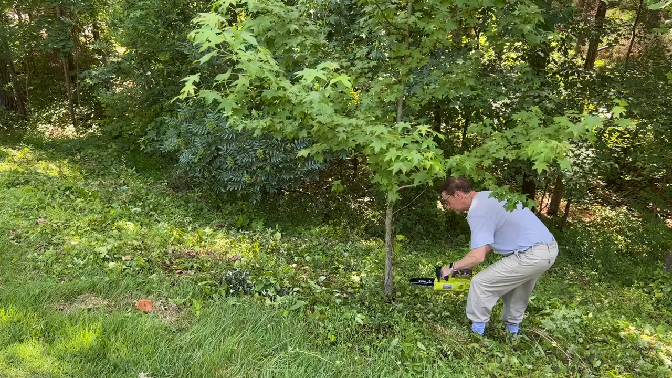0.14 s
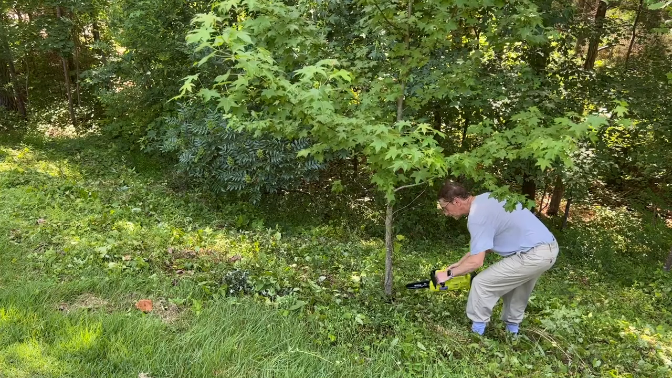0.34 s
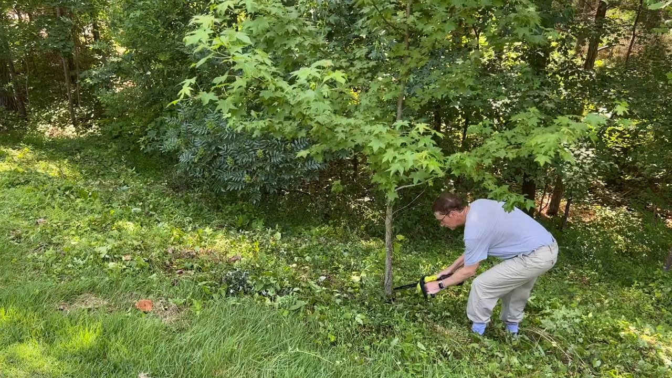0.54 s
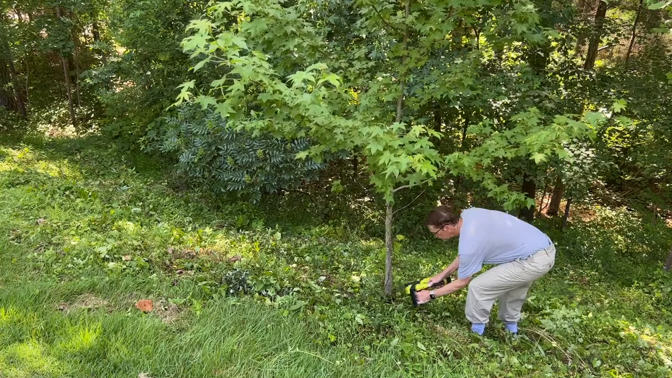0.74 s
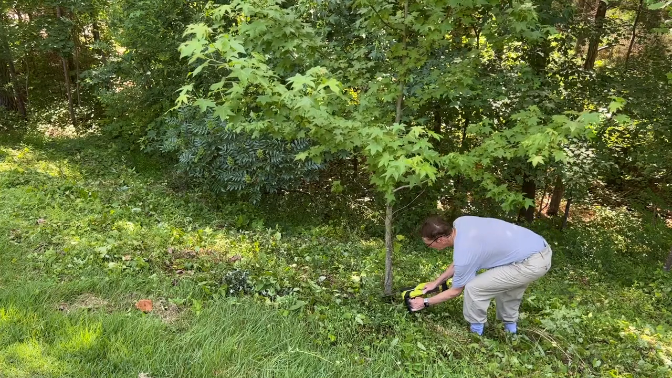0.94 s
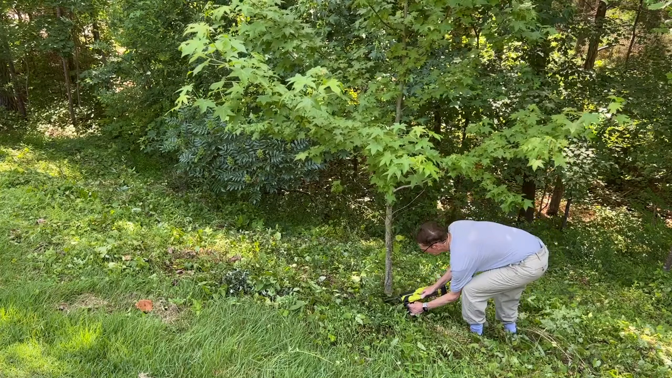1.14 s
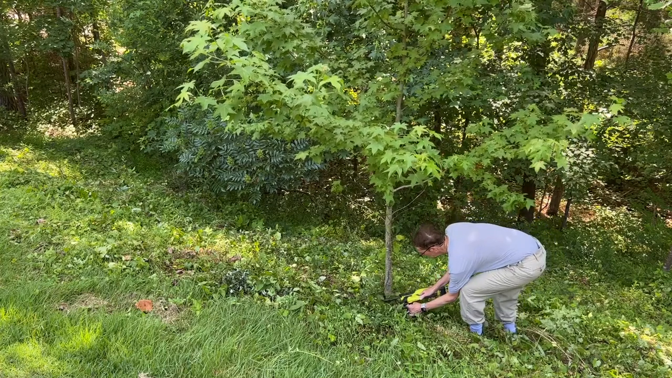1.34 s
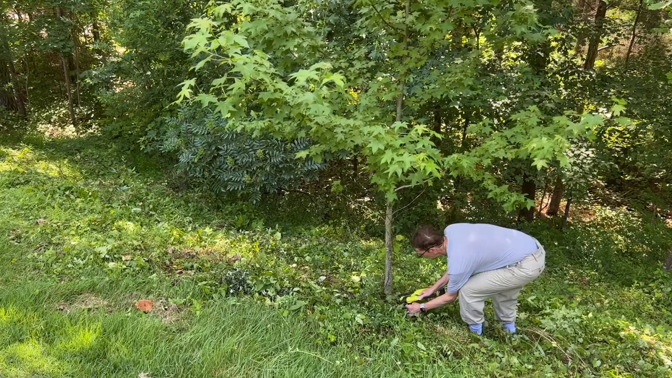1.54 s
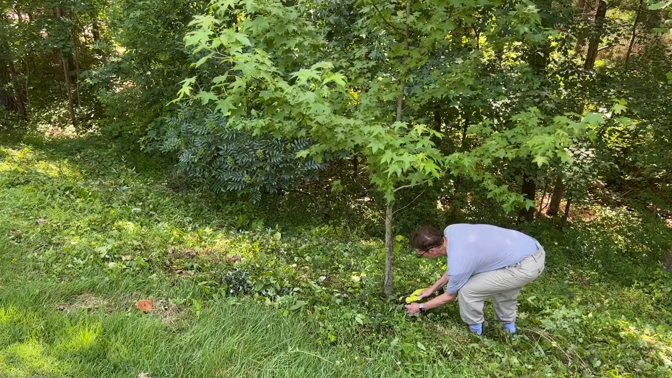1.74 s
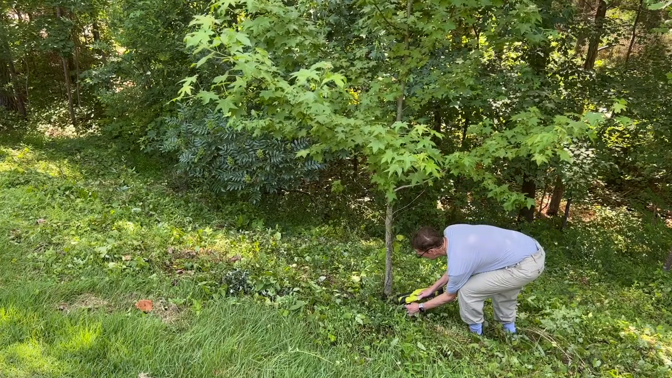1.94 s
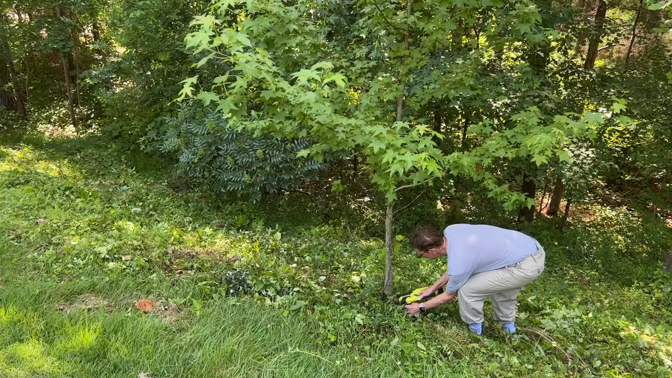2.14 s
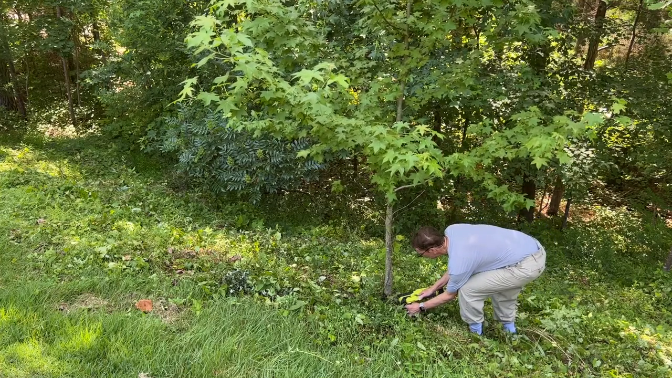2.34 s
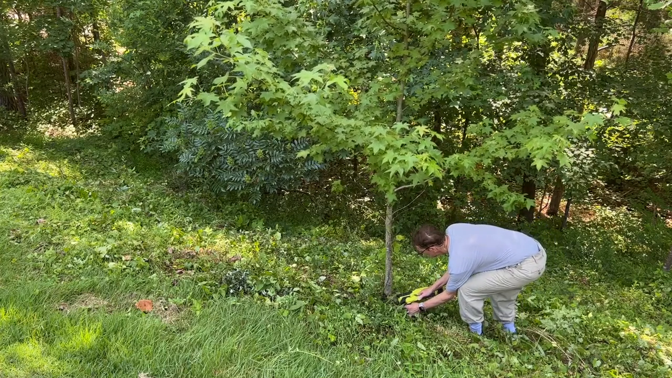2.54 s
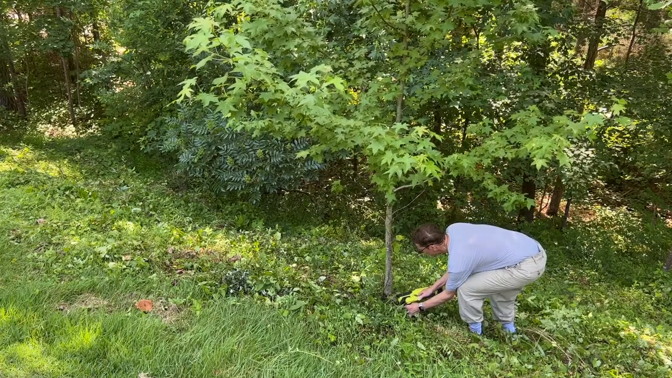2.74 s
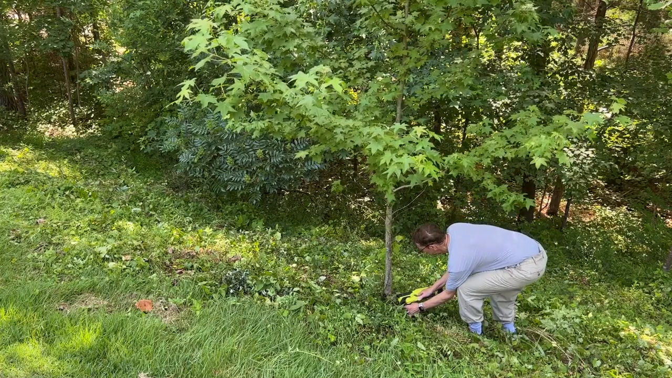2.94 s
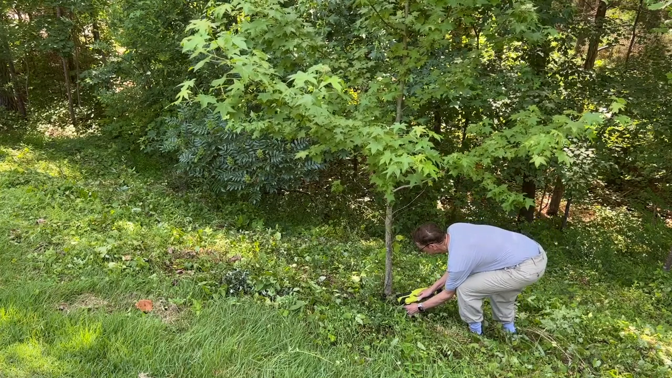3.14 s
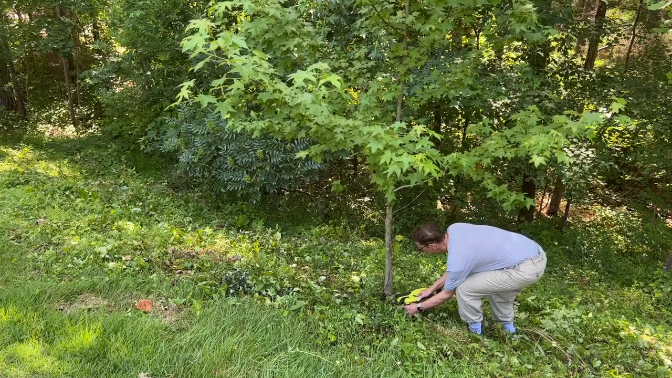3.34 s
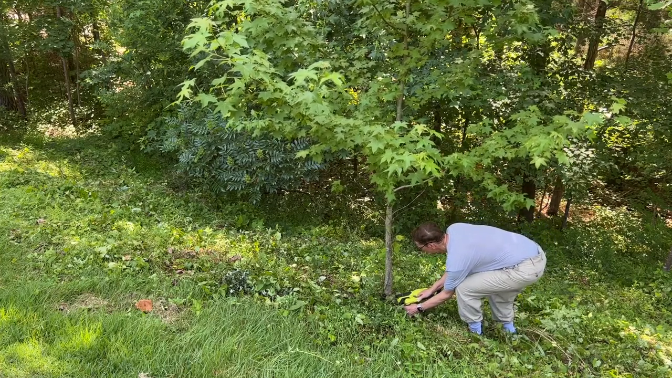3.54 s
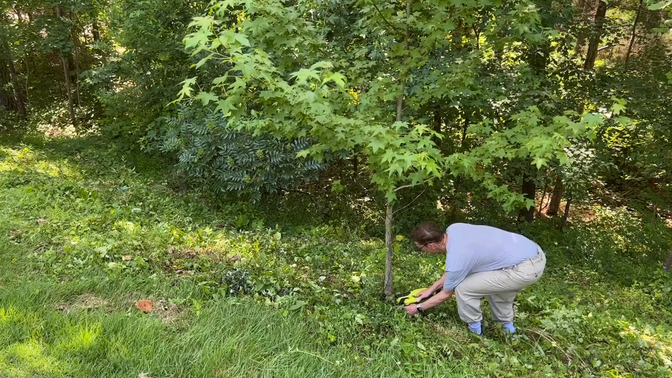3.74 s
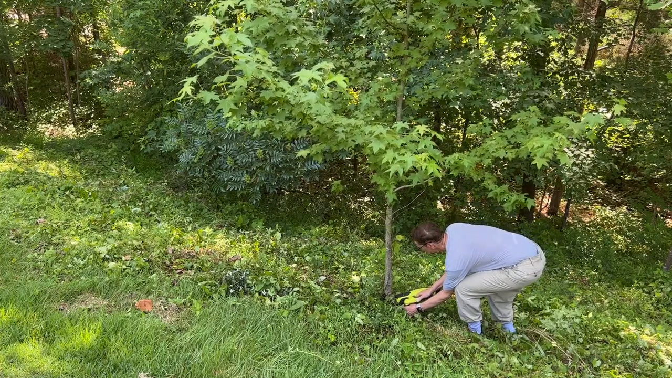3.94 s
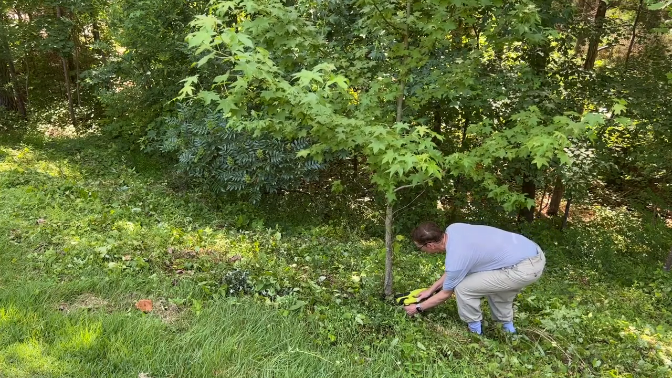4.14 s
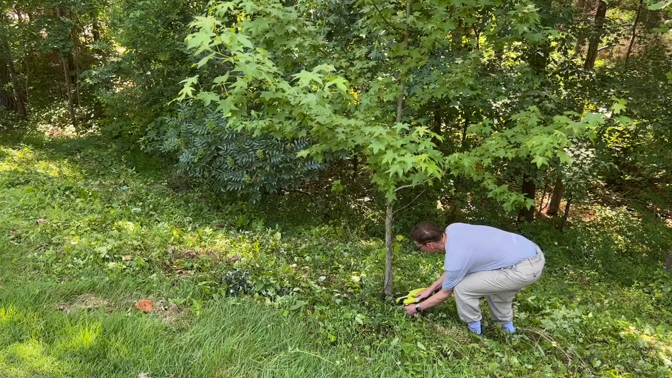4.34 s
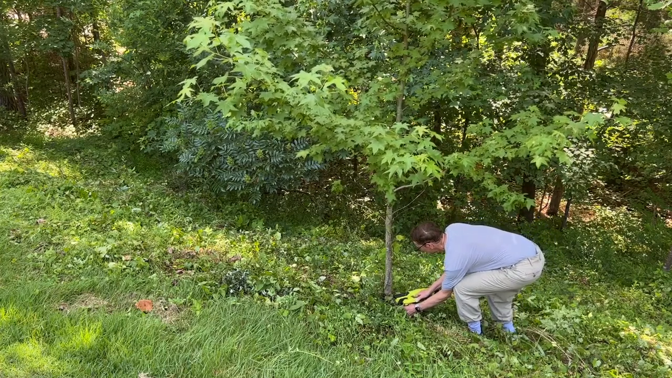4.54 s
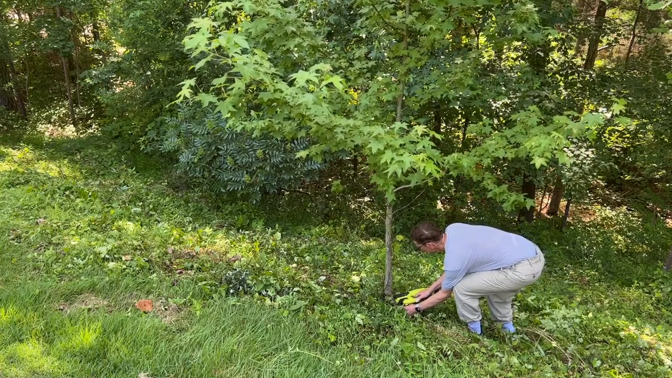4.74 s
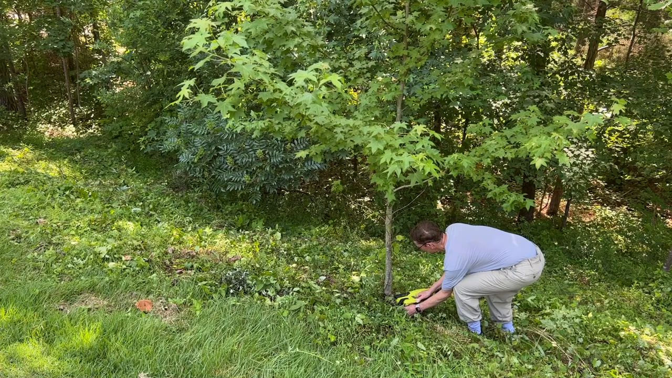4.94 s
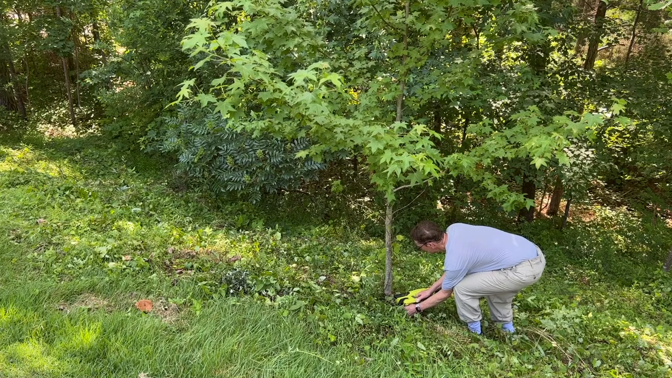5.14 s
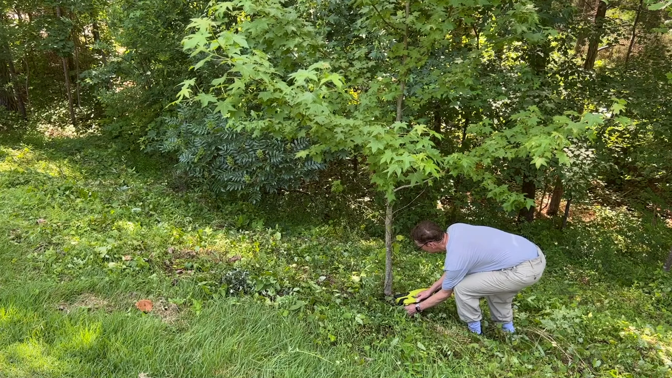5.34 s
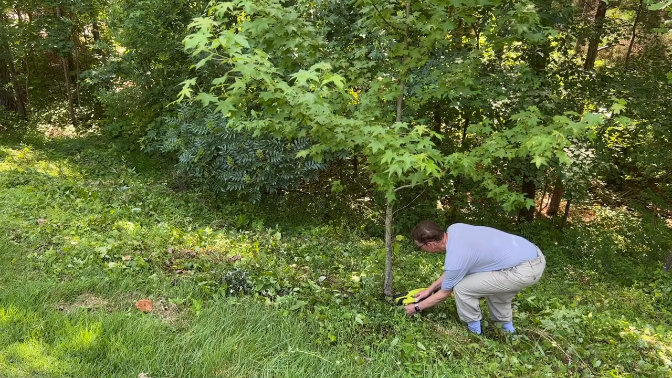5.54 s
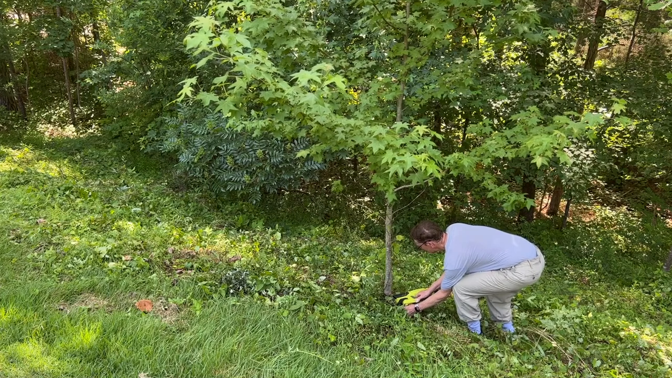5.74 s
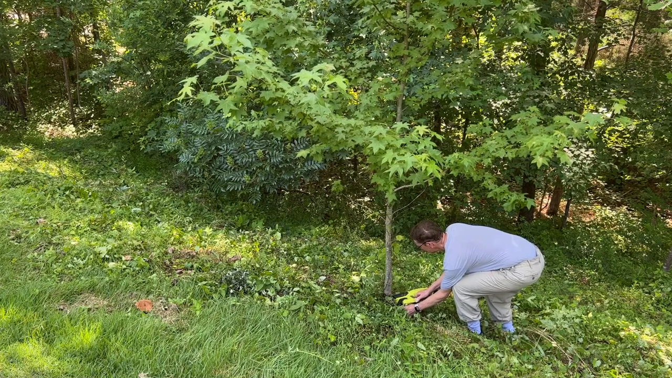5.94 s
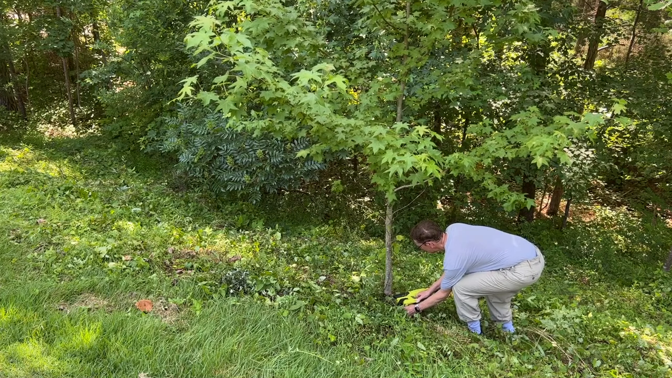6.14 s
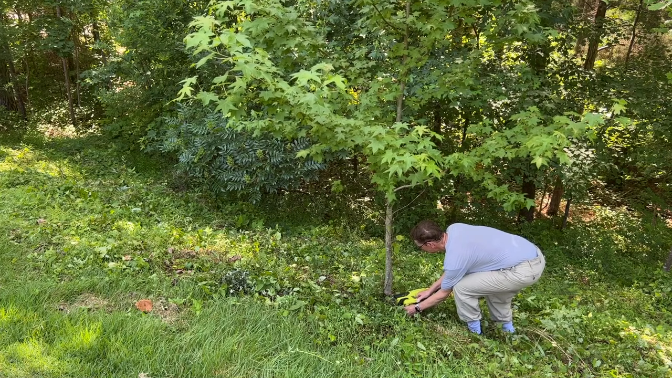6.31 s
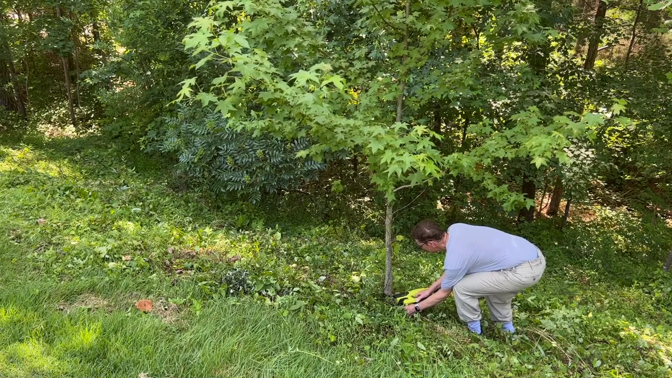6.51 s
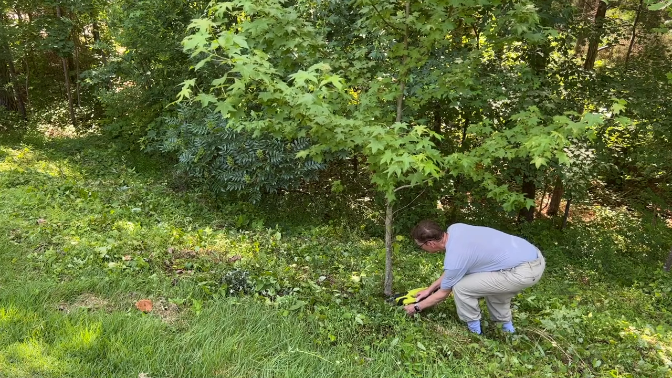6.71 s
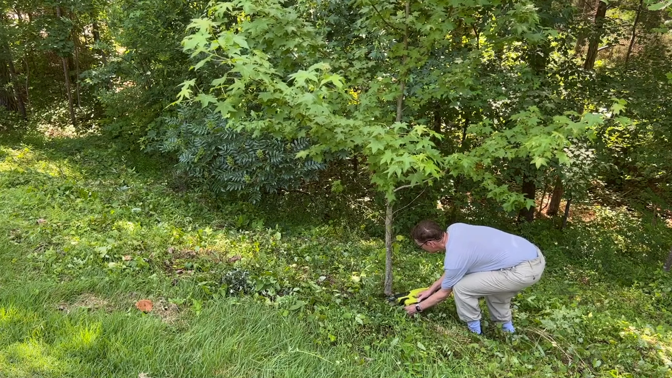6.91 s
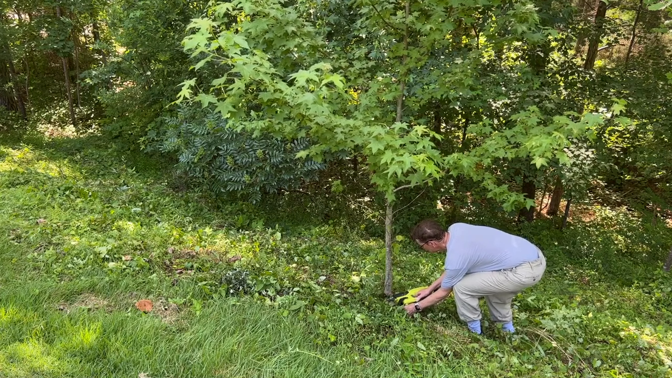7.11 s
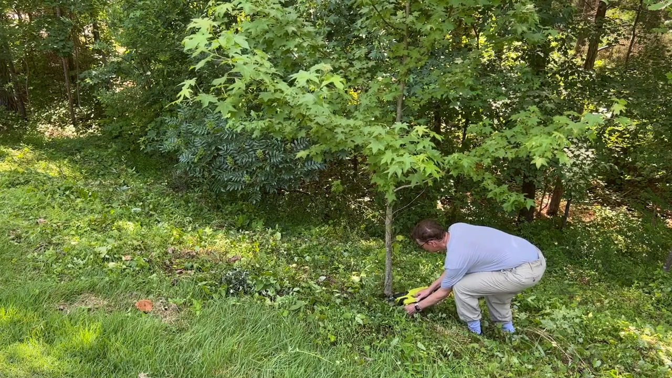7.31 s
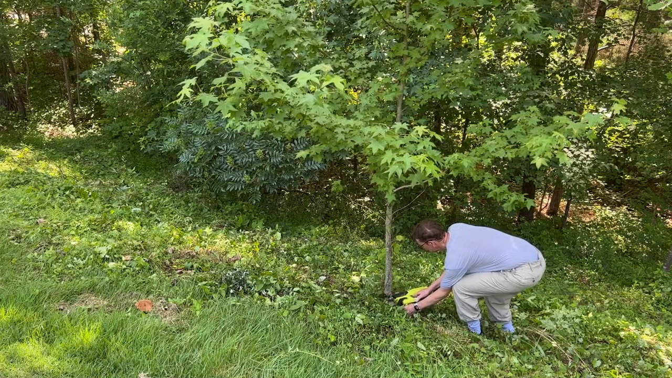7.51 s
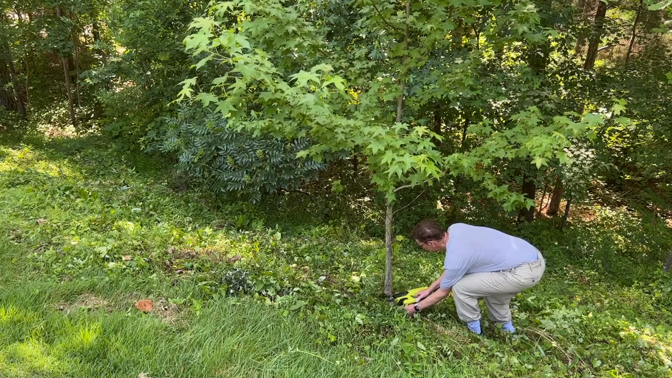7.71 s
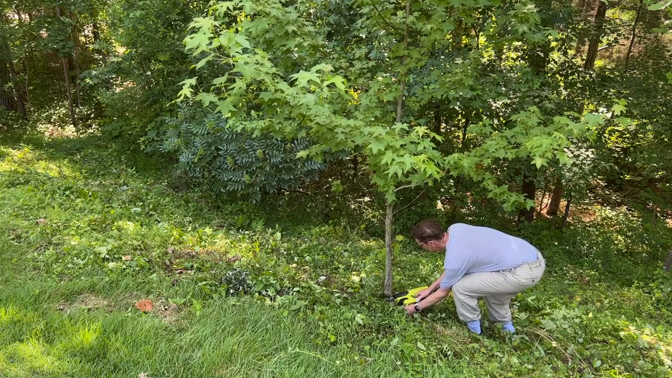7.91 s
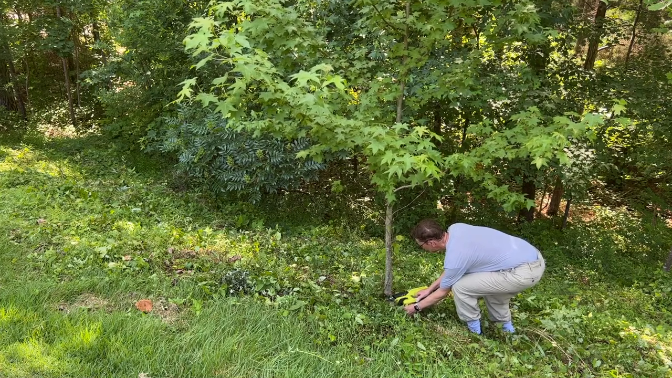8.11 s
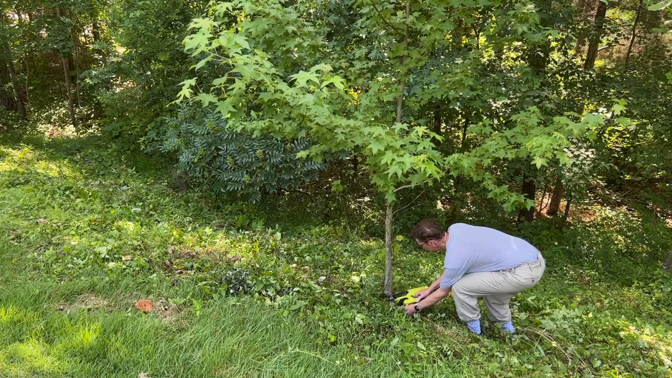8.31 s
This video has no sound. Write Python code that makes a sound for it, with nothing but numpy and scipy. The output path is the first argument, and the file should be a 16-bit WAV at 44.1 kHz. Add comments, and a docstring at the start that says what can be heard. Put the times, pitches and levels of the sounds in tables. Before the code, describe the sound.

A small battery chainsaw clicks, snaps on and whirs up freely, then bites into a thin green trunk, sagging, rasping and snagging until the end.

```python
"""On a lawn, a few metres away, a small battery chainsaw cuts into a sapling; a far engine drones faintly.
The loose chain clicks as the saw is set in place, the trigger snaps, the motor spins up, the chain runs free.
Then the cutters bite into the green trunk: the speed sags, the gears sing and the chain snags now and then.
Coloured noise makes the air, clicks, rattle and cutting; sines make the engine, motor, gears, hum and squeals.
One count of passing drive links times the rattle, the knocks, the hum and the drive."""
import sys
import numpy as np
from scipy import signal
from scipy.fft import rfft, irfft, next_fast_len
from scipy.io import wavfile
from scipy.ndimage import uniform_filter1d

SR = 44100
rng = np.random.default_rng(int(sys.argv[2]) if len(sys.argv) > 2 else 0)


def output_pcm(signal):
    """Save a mono or channel-first signal as 16-bit PCM at the path in sys.argv[1].

    Samples are clipped to [-1, 1] before scaling.
    """
    pcm = np.clip(np.atleast_2d(signal).T, -1, 1) * 32767
    wavfile.write(sys.argv[1], SR, np.round(pcm).astype(np.int16))


N = 369116
TIME = np.arange(N) / SR
SPROCKET_TEETH, CUTTER_SPACING_LINKS, GEAR_TEETH = 5, 4, 24
MOTOR_TURNS_PER_LINK, MOTOR_SLOTS = 25 / 16, 12
START_S = 0.633   # the motor starts


def from_db(db):
    """Decibels to gain."""
    return 10 ** (np.asarray(db) / 20)


def rms_one(x):
    """Scale to unit rms."""
    return x / np.sqrt(np.mean(x ** 2) + 1e-20)


def in_time(rows):
    """The columns of a curve, one value per sample."""
    s, *columns = np.transpose(rows)
    return [np.interp(TIME, s, c) for c in columns]


def swell(s, rise_s, fall_s):
    """A straight rise to 1 at time s and a straight fall back to 0."""
    return np.interp(TIME, [s - rise_s, s, s + fall_s], [0, 1, 0])


def drift(rate):
    """Smooth chance with spread 1, changing about rate times a second."""
    # drawn at one value per 40 samples; the first 2000 let the smoother settle
    r = np.exp(-80 * np.pi * rate / SR)
    slow = signal.lfilter([1], [1, -2 * r, r * r], rng.standard_normal(N // 40 + 2002))[2000:]
    return np.interp(np.arange(N) / 40, np.arange(len(slow)), rms_one(slow))


def colour(x, spectrum):
    """Causal filter of unit power gain that follows a spectrum and falls steeply beyond its ends."""
    size = next_fast_len(N + SR // 4, True)
    size += size % 2
    octave = np.log2(np.maximum(np.arange(size // 2 + 1) * SR / size, 1))
    hz, db = np.transpose(spectrum)
    beyond = np.abs(octave - np.clip(octave, np.log2(hz[0]), np.log2(hz[-1])))
    # 45 dB per octave beyond the ends, at most 60 dB
    gain = rms_one(from_db(np.interp(octave, np.log2(hz), db) - np.minimum(45 * beyond, 60)))
    # folding the cepstrum gives minimum phase, so nothing sounds before its cause
    cepstrum = irfft(np.log(gain))
    cepstrum[1:size // 2] *= 2
    cepstrum[size // 2 + 1:] = 0
    return irfft(rfft(x, size) * np.exp(rfft(cepstrum)))[:N]


def tone(cycles, waver_db, smear):
    """A sine that follows a count of cycles, wavering in level and (by smear, in radians) in phase."""
    level = rms_one(from_db(waver_db * drift(8.6)))
    return np.sqrt(2) * level * np.sin(2 * np.pi * cycles + smear * drift(15.3))


# colour of the garden air; columns: pitch_hz, relative level_db per Hz
AIR_SPECTRUM = [(18, -26), (30, -18), (102, -15.5), (208, -16.5), (249, -14), (359, -15), (399, -7),
                (455, -13), (1200, -18.5), (1330, -19.5), (15500, -28)]
# level of the air, which carries the far engine along; columns: time_s, level_db
AIR_LEVEL = [(0, -53.5), (0.41, -52.5), (0.425, -65), (0.62, -66.5), (8.37, -75)]
# harmonics of the far engine; columns: multiple of its pitch, level_db relative to the air
FAR_ENGINE_ORDERS = [(1, -9.5), (2, -9.5), (3, -12), (4, -15)]
FAR_ENGINE_HZ = 399


def garden(bump_s=0.388, bump_db=-52, bump_length_s=0.033):
    """Air as soft noise, a far engine as steady harmonics, and one dull low bump."""
    engine = sum(from_db(db) * tone(round(k) * FAR_ENGINE_HZ * TIME, waver_db=0.0, smear=0.11)
                 for k, db in FAR_ENGINE_ORDERS)
    air = from_db(in_time(AIR_LEVEL)[0]) * (colour(rng.standard_normal(N), AIR_SPECTRUM) + engine)
    thud = colour(rng.standard_normal(N), [(12, 2), (50, -30), (200, -17)])
    return air + from_db(bump_db) * np.exp(-((TIME - bump_s) / bump_length_s) ** 2) * thud


# clicks of the slack chain and of twigs
# columns: start_s, relative level_db, ring pitch_hz, t60_s (time to fall 60 dB), treble_db
CLICKS = [(0.161, -33.5, 3620, .012, -4), (0.182, -38, 3500, .03, -8), (0.192, -31.5, 3400, 0.018, -8),
          (0.2003, -28.5, 2800, .012, -11), (0.2219, -24.5, 2660, 0.015, -10),
          (0.2993, -26, 1210, 0.0091, -18), (0.331, -40.5, 1100, .025, 8.5),
          (0.3482, -31.5, 1300, .016, -14), (0.375, -40, 2600, .012, -8), (0.383, -41, 3000, .008, 7)]
# what the clicks ring with; columns: pitch_hz, relative level_db per Hz
CLICK_BODY = [(150, -36), (430, 6), (700, 0), (1100, 2.5), (1900, -10), (2800, 0), (4200, -7.5),
              (5500, -10), (7000, -5), (8300, -2), (9500, -16), (15000, -9)]


def handling(ring_width_hz=900, ring_db=10, tail_db=-20, tail_t60_s=0.13, treble_hz=4500):
    """Short clacks, each stressing one resonance of the saw; metal on metal is brighter than on wood."""
    out, age = np.zeros(N), TIME[:SR // 10]
    soften = signal.butter(3, treble_hz, fs=SR, output="sos")
    sharpen = signal.butter(3, treble_hz, "high", fs=SR, output="sos")
    for s, db, hz, t60, treble_db in CLICKS:
        decay = from_db(-60 * age / t60) + from_db(tail_db - 60 * age / tail_t60_s)
        burst = rng.standard_normal(len(age)) * decay
        ring = signal.lfilter(*signal.iirpeak(hz, hz / ring_width_hz, fs=SR), burst)
        body = signal.sosfilt(soften, burst + from_db(ring_db) * ring)
        clack = body + from_db(treble_db) * signal.sosfilt(sharpen, burst)
        out[int(s * SR):int(s * SR) + len(age)] += from_db(db) * clack / 2
    return colour(out, CLICK_BODY)


# ring of the plastic trigger; columns: pitch_hz, relative level_db per Hz
TRIGGER_BODY = [(300, -22), (850, -7), (1400, -7), (1650, -13), (1950, 3), (2300, -5), (2900, -1),
                (4050, -24), (4800, -11), (5700, -11), (6600, -22), (8400, -10), (9500, -22), (15000, -22)]


def trigger(at_s=.5805, peak_db=-23, t60_s=0.02, rise_s=0.0018):
    """The plastic trigger lock snaps in: one fast-dying noise burst in the colour of the plastic."""
    age = TIME - at_s
    burst = np.clip(1 + age / rise_s, 0, 1) * from_db(-60 * np.clip(age / t60_s, 0, 2))
    snap = colour(burst * rng.standard_normal(N), TRIGGER_BODY)
    return from_db(peak_db) * snap / np.abs(snap).max()


# how hard the saw is fed into the trunk; columns: time_s, load (0 running free, 1 a steady cut)
FEED = [(1.3, 0), (1.4, .1), (1.83, .11), (2.03, .52), (2.44, .6), (2.58, .98), (3.1, .8), (3.35, .93),
        (5.4, 1), (6.45, .95), (7.0, 1.18), (8.37, 1.2)]
# the cutters dig in and work free; columns: deepest_s, extra load, build_up_s, recovery_s
DIGS = [(3.64, .38, .08, .33), (4.3, .45, .22, .15), (4.54, .52, .1, .58), (5.53, .55, .06, .4),
        (5.87, .6, .07, .2), (6.07, .62, .17, .27), (6.74, .68, .26, .2), (7.03, .36, .08, .35),
        (7.54, .36, .2, .33), (8.08, .28, .18, .25)]
FREE_SPEED, SAG_PER_LOAD = 247.4, 22   # drive links per s: at no load, and lost per unit of load
SPIN_UP_S, SPEED_WAVER = .039, .004    # time constant; share of the speed per unit of load


def motor():
    """Load and chain speed: the motor spins up, sags in step with the load and wavers under it."""
    load = in_time(FEED)[0] + sum(extra * swell(s, rise, fall) for s, extra, rise, fall in DIGS)
    spun_up = 1 - np.exp(-np.maximum(TIME - START_S, 0) / SPIN_UP_S)
    waver = 1 + SPEED_WAVER * load * drift(20)
    return load, spun_up * (FREE_SPEED - SAG_PER_LOAD * load) * waver


def link_blows(links, decay_links, uneven_db, rise_links=0.081):
    """One swelling and dying burst per link, each of its own strength; rms 1."""
    sizes = from_db(uneven_db * np.clip(rng.standard_normal(4000), -2.3, 2.3))
    blows = sizes[links.astype(int)] * np.exp(-(links % 1) / decay_links)
    # averaging over a share of the mean link period rounds off the onsets
    return rms_one(uniform_filter1d(blows, max(1, int(rise_links * N / links[-1]))))


def pings(count, size, t60_s, uneven_db):
    """Steel links ring briefly at random moments, each at a pitch of its own; rms 1."""
    when, pitch, strength = rng.random((count, 3)).T[:, :, None]
    age = TIME[:size]
    hz = 2000 + 13600 * pitch
    rings = from_db(uneven_db * strength) * from_db(-60 * age / t60_s) * np.sin(2 * np.pi * hz * age)
    places = (when * N).astype(int) + np.arange(size)
    return rms_one(np.bincount(places.ravel(), rings.ravel(), N)[:N])


# the bar moves through four positions, blended between whole numbers; columns: time_s, position 0-3
BAR_POSITION = [(0.6, 0), (1.05, 0), (1.45, 1), (2.1, 1), (2.9, 2), (5.3, 2), (7.0, 3), (8.37, 3)]
# colour of the chain rattle in each position; columns: pitch_hz, relative level_db per Hz
BAR_IN_AIR = [(2000, -8.5), (3170, 3), (4130, -4), (4520, 1.5), (6140, -4), (7240, -3.5), (7950, 2.5),
              (8910, -7), (9630, -5), (10340, -0.5), (11560, -4.5), (14150, -0.5), (15050, 1), (15570, -10)]
BAR_AT_BARK = [(2000, -16), (2840, 1.5), (3360, 3), (6520, -0.5), (6910, -1), (7750, -2), (8270, 5),
               (9040, -8), (9560, -7), (10980, -1), (11560, -5), (12790, 0.5), (15250, -2), (15570, -12)]
BAR_IN_KERF = [(2000, -14), (2260, -8), (3040, 0.5), (4200, -1.5), (4650, -4), (6400, 2), (6910, -2.5),
               (8330, 2), (9370, -9), (10530, -6.5), (11240, -2.5), (12400, -4.5), (14600, -1), (15570, -6)]
BAR_BURIED = [(2000, -12), (2260, -11), (2710, -0.5), (3170, 1.5), (4010, -3.5), (4840, -3.5), (5300, 2),
              (8140, 1), (8980, -5), (10400, -8), (11240, -1.5), (12210, -3.5), (14790, -1), (15570, -3.5)]


def chain_rattle(links, level_db, wobble_db=1.05, flutter_db=0.59, grain_db=0.5, ring_db=-7):
    """Links chatter and ring along the bar, harder once per sprocket turn; the bar's position colours them."""
    tension = from_db(wobble_db * np.sin(2 * np.pi * links / SPROCKET_TEETH) + flutter_db * drift(27))
    grain = rng.standard_normal(N) * from_db(grain_db * drift(700))
    chatter = rms_one(grain * link_blows(links, decay_links=12.0, uneven_db=0.5))
    ringing = pings(count=12000, size=220, t60_s=.012, uneven_db=10)
    contacts = rms_one(tension * (chatter + from_db(ring_db) * ringing))
    position, = in_time(BAR_POSITION)
    colours = (BAR_IN_AIR, BAR_AT_BARK, BAR_IN_KERF, BAR_BURIED)
    blended = sum(np.maximum(1 - np.abs(position - k), 0) * colour(contacts, c)
                  for k, c in enumerate(colours))
    return from_db(level_db) * blended


# low body of the sound, running free and cutting; columns: pitch_hz, relative level_db per Hz
HOUSING = [(40, -33), (130, -34), (330, -16), (480, -3), (670, -1), (990, 3), (1150, -1.5), (1230, 1),
           (1600, -3.5), (2120, -9.5), (2500, -3)]
TRUNK = [(40, -29), (90, -34.5), (290, -14.5), (500, -5.5), (670, -4.5), (970, -1.5), (1060, -4),
         (1150, -1.5), (1570, -4.5), (1990, -16.5), (2260, -22.5), (2500, -10)]


def cutting(links, bite, level_db, free_db=-0.5, wood_db=-2.0, grab_db=0.5, fibre_db=1.0, tear_db=6.0,
            wobble_db=0.0):
    """Each link knocks the housing; in the wood, the cutters tear fibres in uneven bursts that shake the trunk."""
    wobble = from_db(wobble_db * np.sin(2 * np.pi * links / SPROCKET_TEETH))
    knocks = rms_one(rng.standard_normal(N) * wobble * link_blows(links, decay_links=1.0, uneven_db=3.5))
    # fibres give way above a certain pull, which bounds the strongest bursts
    grab = from_db(np.minimum(grab_db * drift(17) + fibre_db * drift(570), tear_db))
    tearing = rms_one(rng.standard_normal(N) * wobble * grab
                      * link_blows(links, decay_links=1.6, uneven_db=1.12))
    free = np.sqrt(1 - bite) * from_db(free_db) * colour(knocks, HOUSING)
    wood = np.sqrt(bite) * from_db(wood_db) * colour(tearing, TRUNK)
    return from_db(level_db) * (free + wood)


# tones of the chain; columns: multiple of the link rate, free_db, cutting_db (both relative to the hum)
LINK_ORDERS = [(2, -3.5, -5.5), (3.2, -13, -22), (3.4, -12, -20), (3.8, -15, -22), (4, -6, -5), (5, -8, -6),
               (5.2, -15, -22), (6, -9.5, -3), (7, -14, -4.5), (8, -24, -18), (9, -15, -24), (11, -13, -15),
               (13, -18, -19), (17, -18, -22)]
# thrum of the cutters, one on every fourth link; columns: multiple of the cutter rate, relative level_db
CUTTER_ORDERS = [(1, -76), (2, -69), (3, -74), (4, -67)]
# levels at the surface, and their change at full depth: the wood closes round the bar, more cutters engage
HUM_DB, HUM_DEPTH_DB = -40.5, -6
THRUM_DB, THRUM_DEPTH_DB = -1, 9


def chain_tones(links, depth, bite):
    """Harmonics of links meeting the sprocket, with sidebands, rougher under load; low thrum of the cutters."""
    hum_db = HUM_DB + HUM_DEPTH_DB * depth
    hum = sum(from_db(hum_db + free_db + bite * (cut_db - free_db))
              * tone(k * links, waver_db=1 + bite, smear=k * (.03 + .05 * bite))
              for k, free_db, cut_db in LINK_ORDERS)
    thrum = sum(from_db(db) * tone(k * links / CUTTER_SPACING_LINKS, waver_db=3.5, smear=0.33)
                for k, db in CUTTER_ORDERS)
    return hum + bite * from_db(THRUM_DB + THRUM_DEPTH_DB * depth) * thrum


# spells in which the motor whine rings out; columns: start_s, end_s, level_db
WHINE_SPELLS = [(.74, 1.158, -38), (1.462, 1.94, -39.5), (1.94, 2.46, -42.5), (3.09, 3.58, -39.5),
                (3.9, 4.133, -42), (5.05, 5.45, -45.5), (6.26, 6.5, -40.5)]
WHINE_DB, WHINE_DB_PER_LOAD, WHINE_FADE_S = -49, -3.5, .05


def whine_level(load):
    """Gain of the motor whine: a bed, fainter under load, or the spell that is ringing out."""
    spells = [from_db(db) * np.interp(TIME, [start - WHINE_FADE_S, start, end, end + WHINE_FADE_S],
                                      [0, 1, 1, 0])
              for start, end, db in WHINE_SPELLS]
    return np.max([from_db(WHINE_DB + WHINE_DB_PER_LOAD * load), *spells], axis=0)


WHINE_ONSET_PACE = 0.87   # below this share of the free speed the whine dies away
# the gears sing once the load presses their teeth together
GEAR_SLACK_DB, GEAR_TIGHT_DB, GEAR_SLACK_LOAD, GEAR_TIGHT_LOAD = -62, -40.5, 0.42, 0.92


def drive(links, pace, load, bite, rotor_db=-56, loaded_db=-1, overtone_db=-18, gear_waver_db=1.5,
          jitter_cycles=0.048):
    """Rotor unbalance, slot whine and the mesh of the reduction gear, which an uneven load jitters."""
    turns, mesh = links * MOTOR_TURNS_PER_LINK, links * GEAR_TEETH / SPROCKET_TEETH
    mesh = mesh + jitter_cycles * load * drift(60)
    rotor = from_db(rotor_db + loaded_db * bite) * pace ** 2 * tone(turns, waver_db=3.5, smear=0.14)
    whine = tone(turns * MOTOR_SLOTS, waver_db=1.8, smear=.7 + .4 * bite ** 2)
    whine_gain = whine_level(load) * np.minimum(pace / WHINE_ONSET_PACE, 1) ** 10
    gear = tone(mesh, waver_db=gear_waver_db, smear=.8)
    gear = gear + from_db(overtone_db) * tone(2 * mesh, waver_db=2.5, smear=.9)
    gear_db = np.interp(load, [GEAR_SLACK_LOAD, GEAR_TIGHT_LOAD], [GEAR_SLACK_DB, GEAR_TIGHT_DB])
    # the gear sits slightly off centre, so its tone beats once per sprocket turn; it also flutters
    beat = (1 + .6 * np.sin(2 * np.pi * links / SPROCKET_TEETH)) * rms_one(from_db(1.8 * drift(30)))
    return rotor + whine_gain * whine + from_db(gear_db) * beat * gear


# brief squeals of the chain; columns: middle_s, half_length_s, from_hz, to_hz, level_db (rms at the middle)
SQUEALS = [(.705, .04, 3000, 3480, -37), (1.19, .025, 4700, 5080, -43), (1.28, .06, 4950, 4720, -45),
           (5.855, 0.028, 4380, 4450, -42), (6.668, .025, 4520, 4380, -38), (6.77, .044, 4300, 4420, -41)]


def squeals():
    """The chain binds in the bar groove for a moment and gives a rough, gliding squeal."""
    out, unsteady_hz = np.zeros(N), 60 * drift(120)
    for s, length, from_hz, to_hz, db in SQUEALS:
        near = slice(int((s - 2 * length) * SR), int((s + 2 * length) * SR))
        along = (TIME[near] - s) / length
        hz = np.interp(along, [-1, 1], [from_hz, to_hz]) + unsteady_hz[near]
        sine = np.sin(2 * np.pi * np.cumsum(hz) / SR)
        out[near] += np.sqrt(2) * from_db(db) * np.exp(-along ** 2) * sine
    return out


def groove_whistle(depth, hz=4420, wander_hz=70, unsteady_hz=90, level_db=-45, flicker_db=5):
    """The chain rubs in its groove: a faint flickering whistle, stronger as the kerf deepens."""
    pitch = hz + wander_hz * drift(4) + unsteady_hz * drift(119)
    whistle = from_db(flicker_db * drift(7)) * np.sin(2 * np.pi * np.cumsum(pitch) / SR)
    return from_db(level_db) * depth * rms_one(whistle)


# a cutter snags; columns: middle_s, level_db, half_length_s, treble_db (the jerk relative to the jolt)
SNAGS = [(2.135, -27, 0.0024, -5), (2.44, -33.5, .024, -5), (3.616, -30, 0.009, -6), (4.332, -32, .003, -5),
         (4.627, -34, .0035, 6), (5.484, -27.5, 0.0043, 1.5), (5.849, -28.5, .004, 4.5),
         (5.977, -26.5, .0032, -7), (6.688, -31.5, 0.0043, 4), (6.974, -28, 0.0033, 1)]


def snags():
    """A caught cutter jolts the trunk and jerks the chain: short noise swells in both their colours."""
    jolt, jerk = np.zeros((2, N))
    for s, db, length, treble_db in SNAGS:
        near = slice(int((s - 3 * length) * SR), int((s + 3 * length) * SR))
        envelope = from_db(db) * np.exp(-((TIME[near] - s) / length) ** 2)
        jolt[near] += envelope
        jerk[near] += envelope * from_db(treble_db)
    return colour(jolt * rng.standard_normal(N), TRUNK) + colour(jerk * rng.standard_normal(N), BAR_BURIED)


# the bar sinks into the trunk at an even pace; columns: time_s, depth of the kerf 0-1
KERF = [(2.0, 0), (8.37, 1)]
# level of the chain rattle, before its trim and the pace; columns: time_s, level_db
RATTLE_LEVEL = [(0.72, -29.5), (1.54, -30.5), (3.44, -28.5), (5.97, -29.5), (6.95, -29), (7.01, -29),
                (7.43, -29.5), (8.3, -29)]
# just after two of the snags the chain skips and goes quieter; columns: lowest_s, change_db, recovery_s
SKIPS = [(5.89, -2, 0.13), (7.01, -3, 0.19)]
# the bar judders and the cutting swells, on the bark and again deep in the cut
# columns: loudest_s, change_db, build_up_s, fade_s
JUDDERS = [(2.218, 4, .3, 0.35), (7.8, 1.5, 0.19, 0.86)]
FULL_BITE_LOAD = 0.64   # at about this load all the cutters are in the wood
# knocking and cutting: level at no load, rise per unit of load, and the kick of the starting motor
WOOD_DB, WOOD_DB_PER_LOAD, KICK_DB, KICK_S = -38, 4, 4.5, .025


def scene(rattle_trim_db=0.32, rattle_growth=0.52, hum_growth=5.0, attack_s=0.0055, skip_onset_s=0.036,
          free_bite=.02):
    """Load and kerf depth set the speed and levels; the drive turns with the chain; both channels are alike."""
    load, speed = motor()
    depth, = in_time(KERF)
    links = np.cumsum(speed) / SR   # drive links gone by
    pace = speed / FREE_SPEED
    age = np.maximum(TIME - START_S, 0)
    bite = np.clip(free_bite + load / FULL_BITE_LOAD, 0, 1)
    skip_db = sum(db * swell(s, skip_onset_s, recovery) for s, db, recovery in SKIPS)
    judder_db = sum(db * swell(s, build_up, fade) for s, db, build_up, fade in JUDDERS)
    wood_db = WOOD_DB + WOOD_DB_PER_LOAD * load + KICK_DB * np.exp(-age / KICK_S) + judder_db
    rattle_db = in_time(RATTLE_LEVEL)[0] + rattle_trim_db + skip_db
    saw = (pace ** rattle_growth * chain_rattle(links, rattle_db)
           + cutting(links, bite, wood_db + skip_db)
           + pace ** hum_growth * chain_tones(links, depth, bite)
           + drive(links, pace, load, bite)
           + groove_whistle(depth))
    running = np.minimum(age / attack_s, 1)
    return np.tile(running * saw + squeals() + snags() + handling() + trigger() + garden(), (2, 1))


def record(dry):
    """The top is cut steeply above 15750 Hz."""
    return signal.sosfilt(signal.ellip(12, .1, 80, 15750, fs=SR, output="sos"), dry)


dry = scene()
out = record(dry)
output_pcm(out)
```